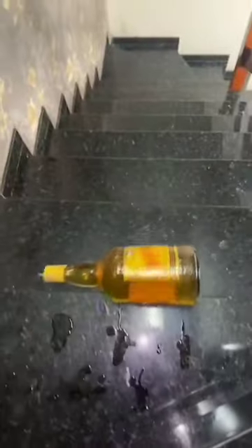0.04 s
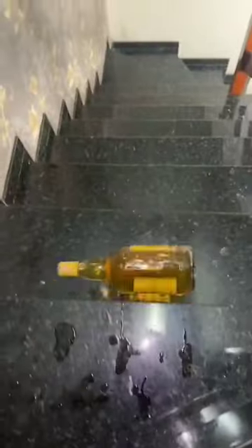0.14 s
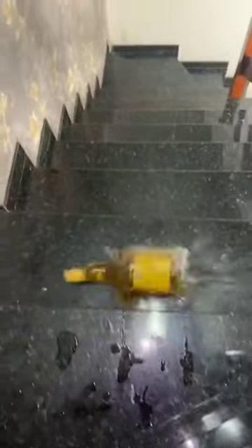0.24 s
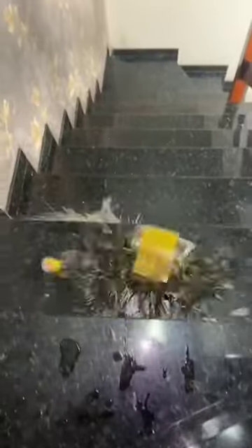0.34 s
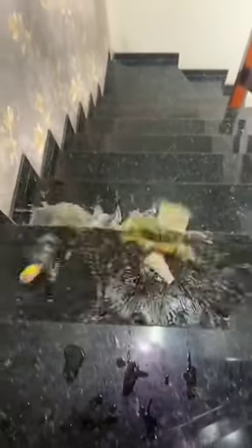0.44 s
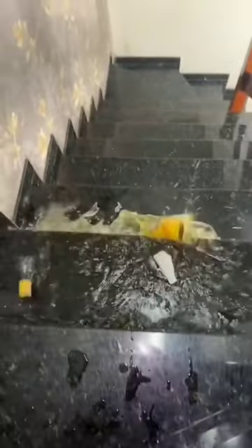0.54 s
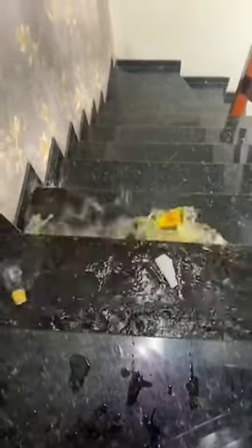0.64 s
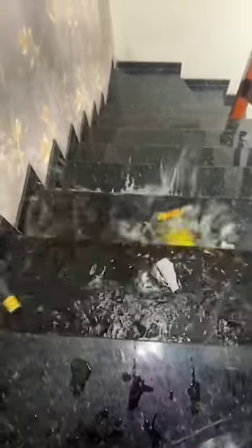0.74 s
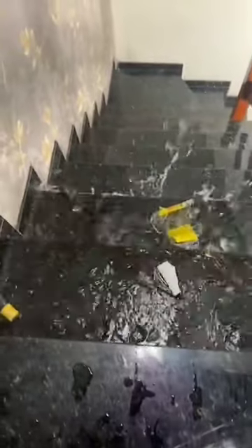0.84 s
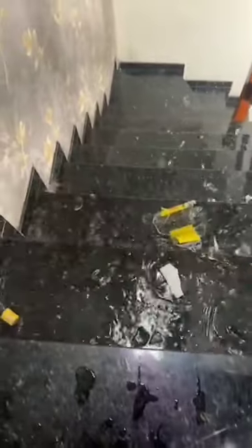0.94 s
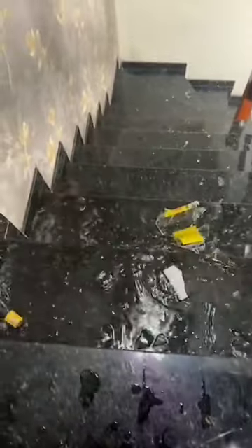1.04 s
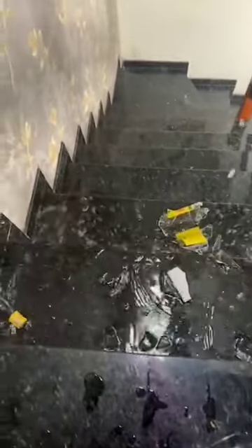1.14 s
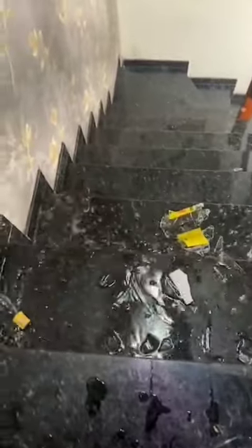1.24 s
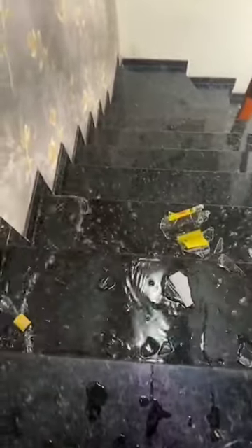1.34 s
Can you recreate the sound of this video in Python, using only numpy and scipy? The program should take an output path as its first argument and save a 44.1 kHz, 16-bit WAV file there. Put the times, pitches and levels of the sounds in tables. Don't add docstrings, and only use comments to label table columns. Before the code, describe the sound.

A full glass bottle bursts on a stone step, its pieces clinking down an echoing stairwell.

```python
import sys
import numpy as np
from scipy import signal
from scipy.fft import rfft, irfft
from scipy.io import wavfile

SR = 44100
rng = np.random.default_rng(int(sys.argv[2]) if len(sys.argv) > 2 else 0)


def pcm_store(signal):
    levels = np.round(np.clip(np.atleast_2d(signal), -1, 1) * 32767)
    wavfile.write(sys.argv[1], SR, levels.astype(np.int16).T)


def convert_level_to_amplitude(level_db):
    exponent = np.asarray(level_db, float) / 20
    return 10 ** exponent


N = 61740
TIME = np.arange(N) / SR
BLOW_RISE, SOFT_RISE = 0.19, 0.5

RING_OVER_CRACK = (-8, 5, 11, -1)


def level(x, db):
    return x * convert_level_to_amplitude(db) / np.sqrt(np.mean(x ** 2))


def read(table, hz):
    table = np.array(table, float)
    return np.interp(np.log(np.maximum(hz, 1)), np.log(table[:, 0]), table[:, 1])


def colour(x, spectrum):
    size = 4096
    log_gain = np.log(convert_level_to_amplitude(read(spectrum, np.fft.rfftfreq(size, 1 / SR))))
    cepstrum = irfft(log_gain)
    cepstrum[1:size // 2] *= 2
    cepstrum[size // 2 + 1:] = 0
    h = irfft(np.exp(rfft(cepstrum)))
    return signal.fftconvolve(x, h / np.sqrt(np.sum(h ** 2)))[:len(x)]


def ring(x, hz, width_hz):
    b, a = signal.iirpeak(hz, hz / width_hz, fs=SR)
    return signal.lfilter(b, a, x) / np.sqrt(np.pi * width_hz / SR)


def clatter(contacts, rise):
    clicks_per_s, spread_db = 4000, 2
    shape = np.zeros(N)
    for start, db, length in contacts:
        u = np.maximum(TIME - start, 0) / length
        shape += convert_level_to_amplitude(db) * (1 - np.exp(-u / rise)) * np.exp(-u)
    chance = rng.random((3, N))
    hits = chance[0] < clicks_per_s / SR
    signs = np.sign(chance[1] - 0.5)
    strengths = convert_level_to_amplitude(-spread_db * np.log(chance[2]))
    clicks = level(hits * signs * strengths, 0)
    return shape * (0.68 * clicks + 1.073 * rng.standard_normal(N))


def piece(blows, tones, crack, ring_db):
    push = clatter(blows, BLOW_RISE)
    tone = np.zeros(N)
    for k, (hz, width_hz, db) in enumerate(tones):
        tone += (-1) ** k * convert_level_to_amplitude(db) * ring(push, hz, width_hz)
    total = np.sqrt(sum(convert_level_to_amplitude(db) ** 2 for _, _, db in tones))
    return colour(push, crack) + convert_level_to_amplitude(ring_db) * tone / total


def bits(contacts, rise):
    total = np.zeros(N)
    for start, db, length, hz, width_hz in contacts:
        push = clatter([(start, db, length)], rise)
        band = ring(ring(push, hz, width_hz), hz, width_hz)
        total += band * np.sqrt(2 * np.pi * width_hz / SR)
    return total


def stairwell(x, echo_db):
    # (frequency [Hz], time to fall 60 dB [s])
    decay = [(60, 0.2), (200, 1), (800, 0.69), (2000, 0.63), (5000, 0.53), (9000, 0.45), (15000, 0.26)]
    first_wall_s, build_s = 0.0062, 0.0013
    noise = rfft(rng.standard_normal(N))
    octave = np.log2(np.maximum(np.fft.rfftfreq(N, 1 / SR), 1) / 40)
    tail = np.zeros(N)
    for k in np.arange(0, 9.5, 0.5):
        band = irfft(noise * np.clip(1 - 2 * np.abs(octave - k), 0, 1), N)
        tail += band * convert_level_to_amplitude(-60 * TIME / read(decay, 40 * 2 ** k))
    tail *= 1 - np.exp(-np.maximum(TIME - first_wall_s, 0) / build_s)
    tail /= np.sqrt(np.sum(tail ** 2))
    return x + convert_level_to_amplitude(echo_db) * signal.fftconvolve(x, tail)[:N]


def hush():
    # (frequency [Hz], density [dB per Hz])
    spectrum = [(59, -51), (100, -8), (424, -8), (1100, -5), (1610, -9.5), (3320, -12.5), (14400, -24.5),
                (16000, -47)]
    return level(colour(rng.standard_normal(N), spectrum), -62.5)


def rumble():
    # (time [s], level [dB])
    course = [(0.0, -60), (0.202, -58.5), (0.226, -70), (0.354, -57.5), (1.072, -57.5), (1.36, -86.5),
              (1.4, -63)]
    hz, width_hz = 81, 39
    hum = ring(ring(rng.standard_normal(N), hz, width_hz), hz, width_hz)
    return level(hum, 0) * convert_level_to_amplitude(np.interp(TIME, *np.array(course).T))


def earlier_knock():
    # (frequency [Hz], density [dB per Hz])
    spectrum = [(24, -19), (40, -13), (85, -14), (140, -40), (305, -9.5), (600, -16), (1370, -32),
                (1900, -32), (16000, -69)]
    t60_s = 0.63
    return level(colour(rng.standard_normal(N), spectrum), -43) * convert_level_to_amplitude(-60 * TIME / t60_s)


def skids_and_splashes():
    # (time [s], level [dB], length [s], frequency [Hz], width [Hz])
    sprays = [(.543, -34.5, 0.025, 11600, 1500), (.59, -56, .012, 10000, 3500),
              (.612, -27, 0.016, 9900, 3520), (.6, -28.5, 0.15, 1310, 2500), (.72, -42, 0.087, 13800, 5030),
              (.815, -25.5, 0.066, 7470, 990), (.85, -33.5, 0.031, 8250, 1800),
              (.96, -41, 0.02, 12600, 2000), (1.003, -25.5, 0.016, 8780, 3500), (.99, -54, 0.07, 200, 204),
              (1.03, -46, 0.096, 2900, 3070), (1.03, -37.5, 0.074, 10540, 7100),
              (1.12, -34, 0.034, 8140, 6200), (1.185, -46, .03, 8000, 7000)]
    return bits(sprays, SOFT_RISE)


def sharp_ticks():
    # (time [s], level [dB], length [s], frequency [Hz], width [Hz])
    ticks = [(.3560, -21, 0.012, 1128, 151), (.5870, -18.5, 0.0058, 10000, 3540),
             (.6045, -18.5, 0.012, 10000, 3920), (.6860, -19.5, 0.018, 4440, 3500),
             (.6885, -18, 0.036, 9460, 5000), (.6945, -14.5, 0.0027, 1917, 210),
             (.7000, -15.5, .005, 10330, 1200), (.7230, -16, 0.0049, 753, 82),
             (.7850, -27, 0.0046, 800, 83), (.8020, -25, 0.0075, 3820, 120),
             (.9550, -43.5, 0.013, 1890, 100), (.9850, -31, 0.025, 9900, 7900),
             (1.0100, -54, 0.0048, 5950, 145.3), (1.3040, -48, 0.0059, 2150, 155),
             (1.3940, -48.5, 0.0035, 4700, 3910)]
    return bits(ticks, BLOW_RISE)


def base():
    # (time [s], level [dB], length [s])
    blows = [
        (.694, -14.5, 0.011),
        (.71, -19, 0.013),
        (.722, -23.5, 0.015),
        (.745, -23.5, 0.0067),
        (.778, -21, 0.0094),
    ]
    # (frequency [Hz], width [Hz], level [dB])
    tones = [(770, 70, -2), (610, 80, -8), (830, 70, -6), (945, 90, -7), (1550, 100, -8), (1690, 100, -6),
             (1920, 100, -11), (3650, 250, -9)]
    # (frequency [Hz], density [dB per Hz])
    crack = [(35, -75), (60, -30.5), (527, -8.5), (767, -8.5), (1310, -3), (1660, -7), (6740, -9),
             (9570, -9.5), (16000, -27)]
    return piece(blows, tones, crack, RING_OVER_CRACK[3])


def neck():
    # (time [s], level [dB], length [s])
    blows = [
        (.582, -26.5, 0.0053),
        (.594, -38.5, 0.00067),
        (.601, -30.5, 0.0071),
        (.62, -35.5, .012),
        (.645, -45, 0.013),
    ]
    # (frequency [Hz], width [Hz], level [dB])
    tones = [(4590, 50, 0), (4730, 120, -6), (6330, 78, -22)]
    # (frequency [Hz], density [dB per Hz])
    crack = [(1000, -30), (3000, -14), (4590, 0), (6500, -14), (16000, -30)]
    return piece(blows, tones, crack, RING_OVER_CRACK[2])


def shell():
    # (time [s], level [dB], length [s])
    blows = [
        (.346, -36, 0.0032),
        (.3555, -18, 0.0031),
        (.362, -26, 0.015),
        (.405, -35.5, 0.029),
        (.432, -31, 0.0047),
    ]
    # (frequency [Hz], width [Hz], level [dB])
    tones = [(1060, 50, 0), (1155, 45, 2), (2110, 45, 1), (2730, 60, -11), (3850, 40, 1), (4635, 45, -1),
             (4980, 80, -11), (5650, 45, -2), (6300, 50, -9)]
    # (frequency [Hz], density [dB per Hz])
    crack = [(100, -47), (300, -18.5), (1100, -1), (2000, -4), (4600, -12.5), (8000, -3), (16000, -26)]
    return piece(blows, tones, crack, RING_OVER_CRACK[1])


def step_boom():
    return ring(clatter([(0.215, -22.5, 0.02)], SOFT_RISE), 219, 77)


def burst():
    # (time [s], level [dB], length [s])
    blows = [
        (.2075, -24, 0.0034),
        (.2093, -4.5, .0012),
        (.211, -24.5, 0.0007),
        (.2135, -19.5, 0.0058),
        (.2265, -14.5, 0.017),
        (.238, -13, 0.0067),
        (.262, -28.5, 0.12),
    ]
    # (frequency [Hz], width [Hz], level [dB])
    tones = [(980, 240, 6.5), (1650, 60, 14), (3070, 89, 0), (3850, 150, -30), (4210, 720, 8),
             (5000, 200, -22), (9420, 140, -27)]
    # (frequency [Hz], density [dB per Hz])
    crack = [(35, -35), (60, -27.5), (202, -12.5), (636, -12), (1200, -4.5), (3500, -5), (6000, -8.5),
             (6740, -9), (16000, -17)]
    return piece(blows, tones, crack, RING_OVER_CRACK[0])


def scene():
    echoes = (-0.5, 1.5, -0.5, -3.5, -7.5, -5)
    sources = [step_boom() + burst(), shell(), neck(), base(), sharp_ticks(), skids_and_splashes()]
    mono = np.zeros(N)
    for source, echo_db in zip(sources, echoes):
        mono += stairwell(source, echo_db)
    mono += earlier_knock() + hush() + rumble()
    return np.array([mono, mono])


def band_limit(x):
    return signal.sosfilt(signal.butter(12, 16620, fs=SR, output="sos"), x)


def record(dry):
    bass_cut_hz, dull_hz, dull_db, top_hz = 40, 6520, -7, 15750
    hz = np.fft.rfftfreq(N, 1 / SR)

    def edge(at_hz, soft_hz):
        return 1 / (1 + np.exp(np.clip((at_hz - hz) / soft_hz, -50, 50)))

    gain = hz / np.hypot(hz, bass_cut_hz)
    gain = gain * convert_level_to_amplitude(dull_db * edge(dull_hz, 40))
    gain = gain * (1 - edge(top_hz, 60))
    rounded = 0.84 * np.tanh(dry / 0.72)
    return band_limit(irfft(rfft(rounded) * gain, N))


dry = scene()
out = record(dry)
pcm_store(out)
```